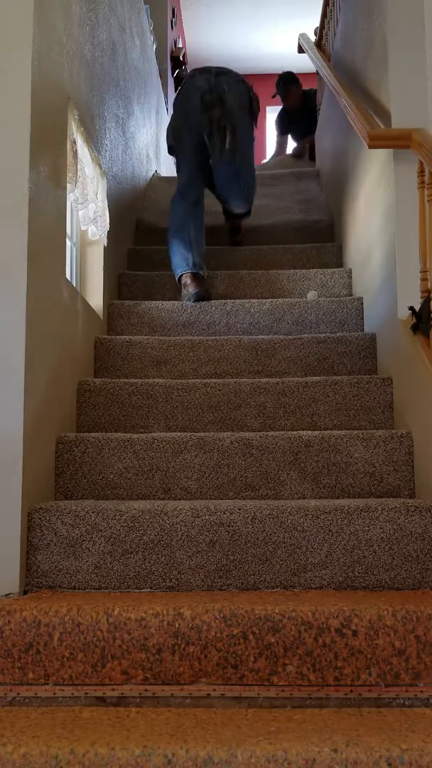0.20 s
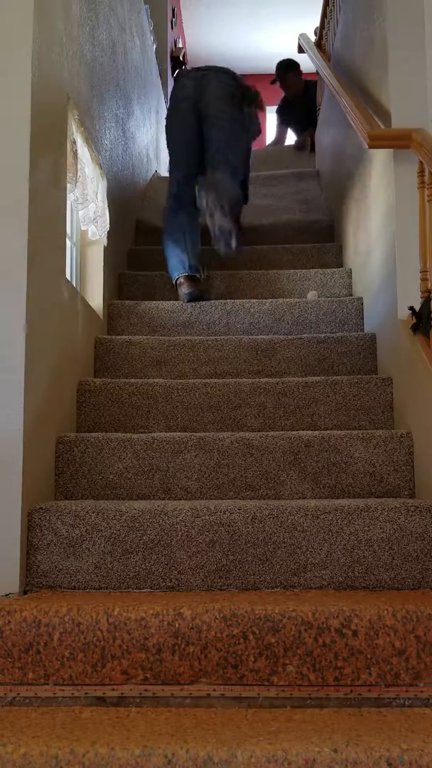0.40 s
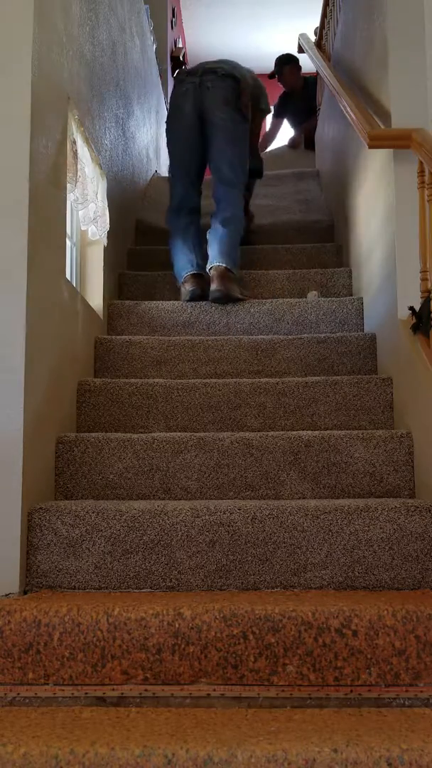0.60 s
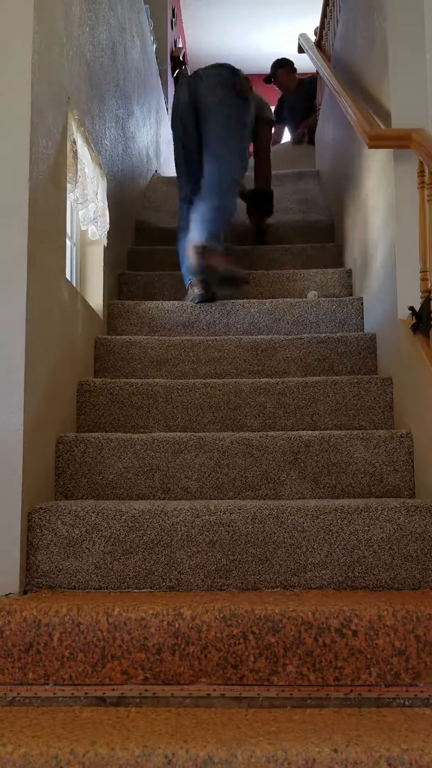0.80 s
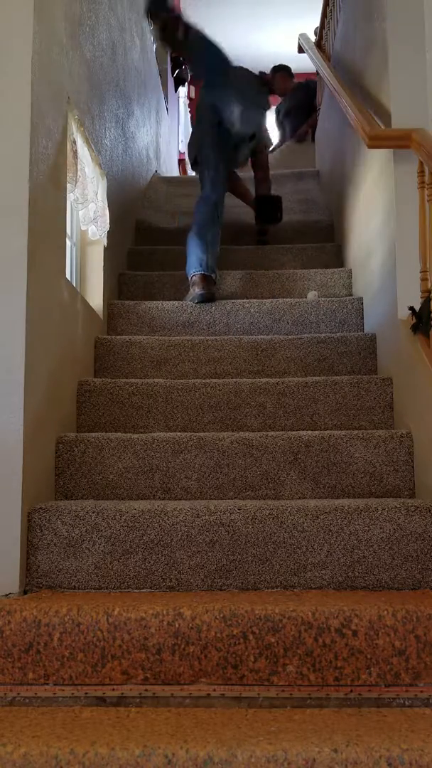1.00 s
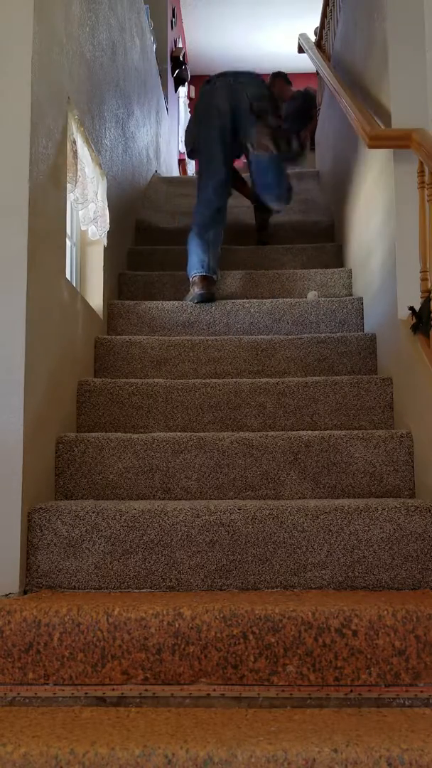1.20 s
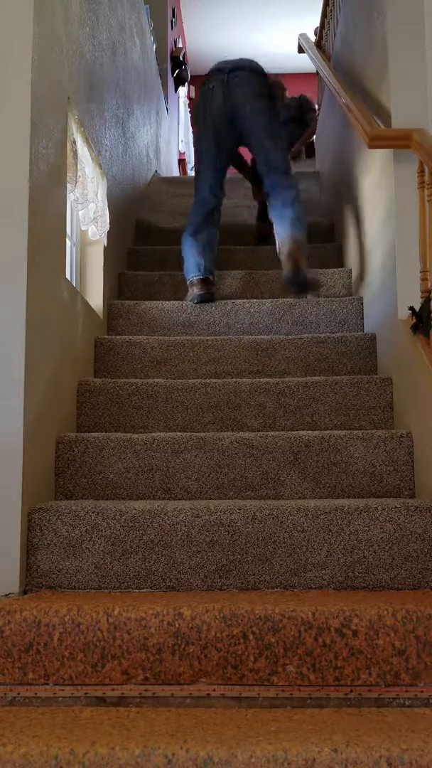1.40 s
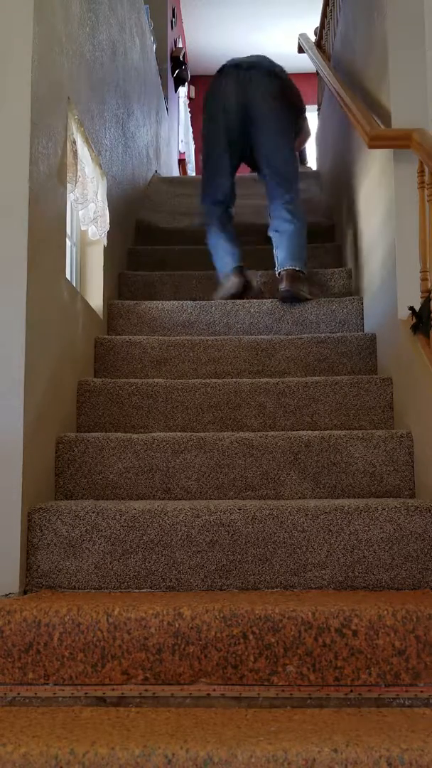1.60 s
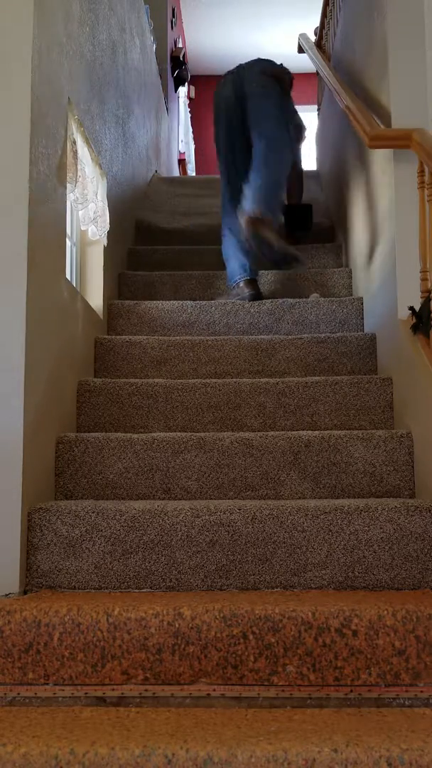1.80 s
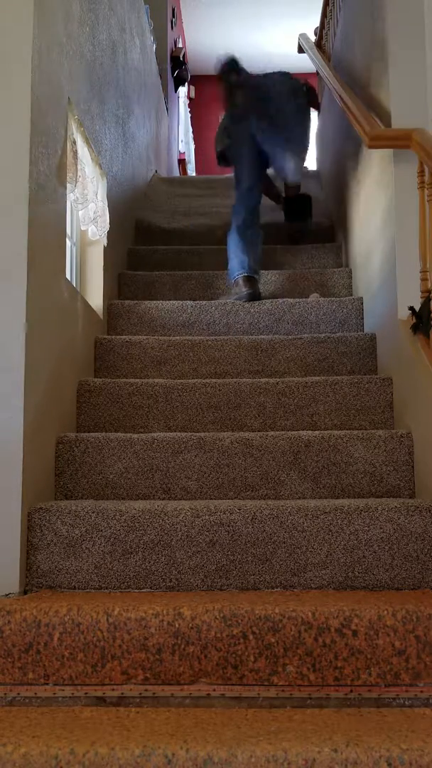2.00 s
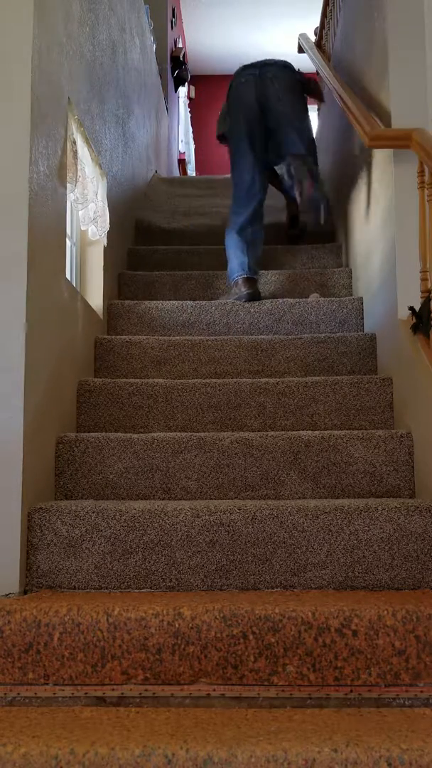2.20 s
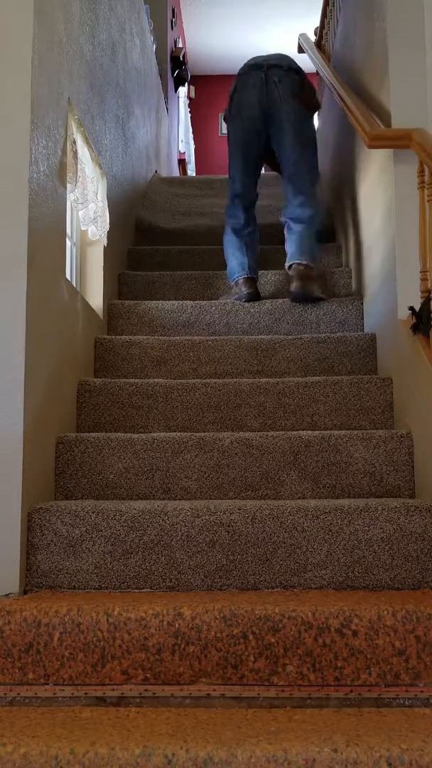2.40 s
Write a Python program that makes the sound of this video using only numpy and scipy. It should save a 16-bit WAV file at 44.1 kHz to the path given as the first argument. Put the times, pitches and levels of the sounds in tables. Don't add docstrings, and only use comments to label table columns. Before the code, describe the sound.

Heavy boots climb carpeted wooden stairs: two strong hollow thuds about a second apart, then a softer one, with clothes rustling and straps ticking between, heard from the foot of a narrow, quiet stairwell.

```python
import sys
import numpy as np
from scipy import signal
from scipy.fft import rfft, irfft, next_fast_len
from scipy.io import wavfile
from scipy.ndimage import uniform_filter1d

SR = 44100
rng = np.random.default_rng(int(sys.argv[2]) if len(sys.argv) > 2 else 0)


def to_linear_factor(level_db):
    exponent = np.asarray(level_db, float) / 20
    return 10 ** exponent


def persist_wave(psi):
    counts = np.round(np.clip(psi, -1, 1) * 32767).astype(np.int16)
    wavfile.write(sys.argv[1], SR, np.atleast_2d(counts).T)


N = 105840
SIZE = next_fast_len(N + SR)
HZ = np.maximum(np.fft.rfftfreq(SIZE, 1 / SR), 1)

# start_s, deep_level_db, tread_level_db, board_level_db, riser_level_db
FOOTFALLS = [(0.202, -11.5, -8.5, -18, -29.5), (.248, -28, -21.5, -28, -35.5), (.54, -31, -36, -47, -75),
             (.752, -33, -45.5, -43, -58), (.86, -44, -68, -66, -69), (0.941, -50, -52, -46.5, -59.5),
             (1.158, -12.5, -12, -17, -27.5), (1.225, -29.5, -45, -31, -56), (1.45, -32, -30, -36.5, -65),
             (1.612, -36.5, -72, -88, -66), (1.692, -39, -45, -60, -71), (2.078, -22, -17.5, -22, -34.5),
             (2.179, -34.5, -35.5, -40, -74), (2.295, -40, -38, -29.5, -36.5),
             (2.346, -34, -33, -32.5, -51)]
# pitch_hz, level_db, t60_s
DEEP_MODES = [(40, -9, .14), (52, -8, 0.15), (62.4, -5, 0.14), (75.6, 0, 0.15)]
TREAD_MODES = [(107, 0.2, 0.057), (127, -1.9, 0.14), (148.6, -0.4, 0.11), (168.4, -3, 0.1)]
BOARD_MODES = [(207, 8, 0.079), (238.2, 4.5, 0.091), (301, -3.5, 0.2), (326.4, -4, 0.12)]
RISER_MODES = [(461.6, 0.8, 0.092), (497, -3.5, .07), (544, -2, 0.097), (713, -9, 0.08)]
PUSH_RISE_S = [0.014, 0.012, 0.01, 0.0086]
# start_s, pitch_hz, level_db
HEELS = [
    (1.45, 91.1, -9),
    (.246, 135, -5),
]
# pitch_hz, level_db
BOOM_SIDE = [(35, -40), (70, -13), (150, -24), (300, -5.5), (600, -6)]
# start_s, level_db, tilt_db_per_octave, edge_touch_level_db
SLAPS = [
    (.125, -47, -1, -13),
    (0.202, -19.5, -0.5, -3.5),
    (0.756, -33, 1, -15),
    (.938, -39, 0, -15),
    (1.152, -19, -0.5, -10.5),
    (1.692, -39, 0, -37),
    (2.072, -27, -1, -4),
    (2.297, -73, 9.5, -10),
]
# pitch_hz, level_db (per Hz)
SLAP_TONE = [(300, -2), (800, -7.5), (1500, -7), (3000, -9.5), (6000, -12), (10000, -11.5), (16000, -11.5)]
# start_s, peak_level_db, ring_pitch_hz, ring_over_click_db
TICKS = [(0.1228, -38, 2530, 8), (0.1361, -21, 5800, 1), (.146, -22.5, 5030, 5), (.3952, -25, 9900, 4),
         (.419, -22, 6070, 7), (0.4296, -17, 5060, 0), (0.4781, -10, 6800, 4), (.489, -21, 11000, 3),
         (0.5493, -7, 4200, 9), (.558, -23, 4500, 10), (0.5754, -12, 10600, 1), (.582, -23, 11000, 2),
         (.6366, -35, 9000, 4), (.6785, -27, 13000, 6), (0.73, -22.5, 5060, 7), (0.7611, -14.5, 11500, 11),
         (.769, -19, 6000, 6), (.776, -21, 3800, 10), (.785, -17, 12000, 4), (0.793, -19, 4500, 10),
         (0.8195, -17, 8000, 4), (0.841, -17, 6500, 4), (0.845, -21, 12000, 3), (0.8695, -19.5, 10100, 6),
         (0.9462, -9.5, 3250, 19), (.9525, -19.5, 9500, 8), (0.961, -19.5, 11100, 1), (1.02, -8, 10800, 13),
         (1.3882, -40.5, 9000, 2), (1.4007, -35, 3800, 20), (1.448, -39.5, 11000, 1),
         (1.677, -38, 2400, 22), (1.8174, -5, 10800, 7), (1.8207, -1.5, 13000, 7), (1.829, -20, 11000, 2),
         (1.874, -14, 10500, 8), (1.8925, -11.5, 10600, 7), (1.9200, -13.5, 2240, 5),
         (1.9362, -15, 12000, 0), (1.969, -27, 11000, 6), (1.9831, -12, 3500, 9), (2.026, -30, 2480, 8),
         (2.0428, -16, 5400, 22), (2.051, -27, 2000, 13), (2.0786, -11, 12000, 5), (2.0866, -18, 1960, 3),
         (2.287, -37.5, 1802, 20)]
# start_s, length_s, pitch_hz, level_db
SQUEAKS = [
    (1.565, .035, 3060, -5),
    (1.54, .125, 3070, -7),
    (1.552, .05, 6050, -12),
    (1.54, .055, 1410, -8),
    (1.555, .02, 2090, -6),
    (2.082, .015, 2000, 25),
]
# time_s, level_db
MOVEMENT = [(0, -73), (.12, -65.5), (.32, -51.5), (.6, -55), (.64, -59.5), (0.869, -48.5), (1.0, -58.5),
            (1.14, -63.5), (1.35, -66), (1.55, -63), (1.67, -73), (1.702, -53), (1.95, -52), (2.17, -65),
            (2.4, -62)]
# pitch_hz, level_db (per Hz)
CLOTH_TONE = [(200, -4.5), (600, -1), (1500, -2), (3000, -6.5), (6000, -11), (11000, -13.5), (16000, -12.5)]
# pitch_hz, level_db (per Hz)
RUMBLE_TONE = [(30, 3.5), (55, -8), (110, -13), (235, -4), (400, -18), (800, -51)]
# start_s, length_s, centre_pitch_hz, level_db
SWISHES = [(0.136, 0.29, 3600, -49.5), (0.652, 0.069, 10200, -40), (0.673, 0.12, 3400, -43),
           (0.759, 0.17, 11000, -44), (0.83, 0.086, 2800, -44.5), (1.759, 0.099, 430, -33),
           (2.028, 0.12, 260, -28.5), (1.1, 0.02, 11000, -53), (1.016, 0.037, 1970, -33.5),
           (1.537, 0.071, 11400, -51.5), (1.8, 0.018, 12000, -70), (1.7, 0.035, 1700, -42),
           (2.026, 0.035, 1500, -36.5), (1.425, 0.12, 291, -32), (2.031, 0.054, 440, -31),
           (2.298, 0.048, 690, -42.5), (2.31, 0.086, 1400, -48.5), (1.698, 0.044, 1440, -40),
           (1.82, 0.041, 1500, -36.5), (1.915, 0.043, 2000, -41), (1.6, 0.087, 1500, -52.5),
           (1.4, .03, 1170, -49.5), (2.075, 0.065, 4000, -41), (.68, 0.11, 64, -36.5),
           (.38, .05, 70, -38.5), (1.405, 0.07, 120, -35), (2.03, .06, 140, -31.5), (1.62, 0.075, 210, -42),
           (1.78, .07, 55, -38), (.035, .08, 2900, -62), (2.3, .09, 330, -31), (1.5, .08, 230, -36),
           (1.83, .15, 2000, -46), (.53, .05, 90, -34), (.215, .09, 390, -24)]
# pitch_hz, level_db (per Hz)
QUIET_TONE = [(30, 21.5), (60, 6.5), (240, 8), (500, -8), (1200, -13), (3000, -31), (7000, -47),
              (16000, -6)]
# pitch_hz, t60_s
STAIRWELL_T60 = [(230, 0.34), (1600, 0.31), (2700, 0.27), (5400, 0.26), (11000, 0.28), (20000, 0.085)]
# pitch_hz, likeness (0 to 1)
LIKENESS = [(60, 0.98), (150, 1), (300, 0.97), (600, 0.09), (1500, 0.033), (10000, 0.026)]
# pitch_hz, left_minus_right_db
PORTS = [(60, 0.5), (110, 0.5), (200, 5), (380, 1), (700, -6), (1290, -1.5), (2380, -7), (4400, -10),
         (8120, -10.5), (15000, -0.5)]
# pitch_hz, level_db
MIC = [(25, -22.5), (45, -2.5), (5000, 0.5), (7600, -9), (9500, -2), (11500, 2), (15000, -6.5),
       (16500, -40)]


def rms_one(x):
    return x / np.sqrt(np.mean(x ** 2) + 1e-20)


def at_hz(points, hz):
    table = np.array(points)
    return np.interp(np.log(hz), np.log(table[:, 0]), table[:, 1])


def colour(x, points):
    cepstrum = irfft(at_hz(points, HZ) * np.log(10) / 20, SIZE)
    cepstrum[1:SIZE // 2] *= 2
    cepstrum[SIZE // 2 + 1:] = 0
    return irfft(rfft(x, SIZE) * np.exp(rfft(cepstrum)), SIZE)[..., :x.shape[-1]]


def shape(x, gain):
    octave = np.log2(np.maximum(np.fft.rfftfreq(len(x), 1 / SR), 50))
    return irfft(rfft(x) * gain(octave), len(x))


def butter(x, order, hz, kind="low"):
    return signal.sosfilt(signal.butter(order, hz, kind, fs=SR, output="sos"), x)


def drift(rate_hz):
    r = np.exp(-80 * np.pi * rate_hz / SR)
    slow = signal.lfilter([1], [1, -2 * r, r * r], rng.standard_normal(N // 40 + 2002))[2000:]
    return np.interp(np.arange(N) / 40, np.arange(len(slow)), rms_one(slow))


def ring(x, hz, t60):
    r, w = to_linear_factor(-60 / (t60 * SR)), 2 * np.pi * hz / SR
    return signal.lfilter([0, np.sin(w)], [1, -2 * r * np.cos(w), r * r], x + 1e-18)


def add(out, s, x):
    i = int(s * SR)
    out[i:i + len(x)] += x[:max(len(out) - i, 0)]


def stereo(mid, side):
    alike = np.clip(at_hz(LIKENESS, HZ), 0, 1)
    m = rfft(mid, SIZE) * np.sqrt((1 + alike) / 2)
    s = rfft(side, SIZE) * np.sqrt((1 - alike) / 2)
    return irfft(np.array([m + s, m - s]), SIZE)[:, :len(mid)]


def stairwell(x, wet_db, share=1):
    first_echo_s = 0.0011
    t = np.arange(SR // 2) / SR
    white, tail = rng.standard_normal((2, 2, len(t))), 0
    for k, low in enumerate(30 * 2 ** np.arange(0, 9.5)):
        band = butter(white[k % 2], 2, [low, min(2 * low, .45 * SR)], "band")
        t60 = share * at_hz(STAIRWELL_T60, np.sqrt(2) * low)
        tail = tail + band * to_linear_factor(-60 * t / t60) / np.sqrt(t60)
    tail = stereo(*(tail * np.clip(t / first_echo_s - 1, 0, 1)))
    tail = to_linear_factor(wet_db) * tail / np.sqrt(np.sum(tail ** 2) / 2)
    tail[:, 0] += 1
    return irfft(rfft(x, SIZE) * rfft(tail, SIZE), SIZE)[:, :N]


def booms():
    out, t = np.zeros(N), np.arange(SR // 3) / SR
    groups = (DEEP_MODES, TREAD_MODES, BOARD_MODES, RISER_MODES)
    fade = np.cos(np.pi / 2 * t / t[-1])
    pushes = rng.standard_normal((len(FOOTFALLS), len(t)))
    for (s, *levels_db), push in zip(FOOTFALLS, pushes):
        for modes, db, rise in zip(groups, levels_db, PUSH_RISE_S):
            force = push * (t / rise) ** 2 * np.exp(-t / rise)
            body = np.zeros(len(t))
            for hz, mode_db, t60 in modes:
                part = ring(force, hz, t60)
                body += to_linear_factor(mode_db) * part / np.abs(part).max()
            body = butter(body, 2, 1.81 * modes[-1][0])
            onset_rms = np.sqrt(np.mean(body[:SR // 16] ** 2))
            add(out, s, to_linear_factor(db) * body * fade / onset_rms)
    return out


def heels():
    sag_per_s, t60_s, swell_s = 1.73, 0.24, 0.019
    out, t = np.zeros(N), np.arange(SR // 4) / SR
    swell = 1 - np.exp(-(t / swell_s) ** 2)
    for s, hz, db in HEELS:
        tone = np.sin(2 * np.pi * np.cumsum(hz * np.exp(-sag_per_s * t)) / SR)
        add(out, s, to_linear_factor(db - 60 * t / t60_s) * swell * tone)
    return out


def slaps():
    delay_s, slap_t60_s, edge_t60_s = 0.005, 0.019, 0.012
    crack_db, crack_t60_s = 2.5, 0.0053
    room_db, wet_db, gain_db = 21.5, -2.5, 18.5
    near, blows, t = np.zeros((2, N)), np.zeros(N), np.arange(SR // 8) / SR
    late = t - delay_s
    slap = to_linear_factor(-60 * late / slap_t60_s) + to_linear_factor(crack_db - 60 * late / crack_t60_s)
    slap = slap * np.clip(late / 0.0011, 0, 1)
    click = 1. * (np.abs(late) == np.abs(late).min())
    bursts = rng.standard_normal((len(SLAPS), 2, len(t)))
    for (s, db, tilt_db, edge_db), burst in zip(SLAPS, bursts):
        tilt = lambda octave: to_linear_factor(tilt_db * (octave - np.log2(3000)))
        swell = to_linear_factor(edge_db - 60 * t / edge_t60_s) + slap
        for side in (0, 1):
            add(near[side], s, to_linear_factor(db) * swell * shape(burst[side], tilt))
        add(blows, s, to_linear_factor(db + room_db) * shape(click, tilt))
    blows = colour(blows, SLAP_TONE)
    room = stairwell(blows, wet_db) - blows
    return to_linear_factor(gain_db) * (stereo(*colour(near, SLAP_TONE)) + room)


def ticks():
    t60_s, gain_db, low_cut_hz, ring_octaves = 0.0045, -1, 1880, 0.37
    out, t = np.zeros(N), np.arange(1024) / SR
    bursts = rng.standard_normal((len(TICKS), len(t)))
    for (s, db, hz, ring_db), burst in zip(TICKS, bursts):
        favour = lambda octave: 1 + to_linear_factor(ring_db) * np.exp(-((octave - np.log2(hz)) / ring_octaves) ** 2)
        snap = shape(burst, favour) * to_linear_factor(-60 * t / t60_s)
        add(out, s, to_linear_factor(db + gain_db) * snap / np.abs(snap).max())
    return butter(out, 2, low_cut_hz, "high")


def squeaks():
    gain_db = -54
    out, waver = np.zeros(N), drift(37.7)
    for s, length, hz, db in SQUEAKS:
        t = np.arange(int(length * SR)) / SR
        w = waver[int(s * SR):][:len(t)]
        tone = np.sin(2 * np.pi * np.cumsum(hz * (1 + .002 * w)) / SR) * to_linear_factor(4 * w)
        add(out, s, to_linear_factor(db + gain_db) * tone * np.sin(np.pi * t / length) ** .5)
    return out


def cloth():
    grains_per_s, grain_db, cloth_db, rumble_db = 1100, 1, 2.5, 6
    move = to_linear_factor(np.interp(np.arange(N) / SR, *np.transpose(MOVEMENT)) + cloth_db)
    sizes = to_linear_factor(4.5 * np.minimum(rng.exponential(1, N), 4)) * rng.choice([-1, 1], N)
    grains = sizes * (rng.random(N) < grains_per_s * to_linear_factor(5.0 * drift(20)) / SR)
    grains = to_linear_factor(grain_db) * rms_one(colour(grains, CLOTH_TONE))
    hiss = stereo(*rms_one(colour(rng.standard_normal((2, N)), CLOTH_TONE)))
    hiss = to_linear_factor(2.0 * drift(57)) * hiss
    rumble = stereo(*rms_one(colour(rng.standard_normal((2, N)), RUMBLE_TONE)))
    rumble = to_linear_factor(rumble_db + 2.0 * drift(3.2)) * rumble
    return move * (hiss + rumble), move * grains


def swishes():
    width_octaves = 0.55
    out = np.zeros((2, N))
    noises = rng.standard_normal((len(SWISHES), 3, SR // 4))
    for (s, length, hz, db), noise in zip(SWISHES, noises):
        u = np.arange(SR // 4) / SR / length
        grain = to_linear_factor(2.7 * rms_one(uniform_filter1d(noise[2], size=150)))
        swell = np.sqrt(u) * np.exp(-2 * u ** 2) * grain
        band = lambda octave: np.exp(-((octave - np.log2(hz)) / width_octaves) ** 2)
        for side in (0, 1):
            add(out[side], s, to_linear_factor(db) * swell * rms_one(shape(noise[side], band)))
    return stereo(*out)


def quiet_house():
    level = to_linear_factor(-52.5 + 4.9 * drift(2.7))
    return level * rms_one(stereo(*colour(rng.standard_normal((2, N)), QUIET_TONE)))


def scene():
    boom = stairwell(booms() + heels(), wet_db=-9)
    boom = boom + colour(booms(), BOOM_SIDE) * [[1], [-1]]
    rub, grains = cloth()
    small = stairwell(ticks() + grains + squeaks(), wet_db=-12, share=0.56)
    return boom + slaps() + small + rub + swishes() + quiet_house()


def band_limit(x):
    return signal.sosfilt(signal.butter(12, 17000, fs=SR, output="sos"), x)


def record(dry):
    left_lead_s, lag_top_hz, cutoff_hz = 0.00012, 12000, 17100
    shading = to_linear_factor(at_hz(PORTS, HZ) / 2)
    lag_s = left_lead_s * np.exp(-(HZ / lag_top_hz) ** 4)
    ports = np.array([shading, np.exp(-2j * np.pi * HZ * lag_s) / shading])
    x = irfft(rfft(colour(dry, MIC), SIZE) * ports, SIZE)[:, :N]
    x = 1.6 * np.tanh(x / 1.6)
    mix = signal.sosfilt(signal.cheby2(10, 50, cutoff_hz, fs=SR, output="sos"), x)
    return band_limit(mix)


dry = scene()
out = record(dry)
persist_wave(out)
```